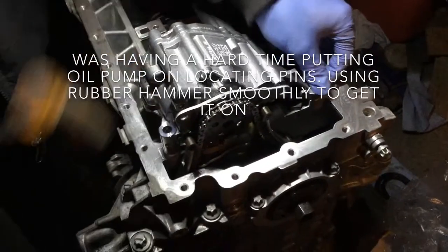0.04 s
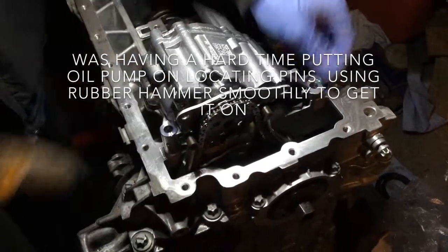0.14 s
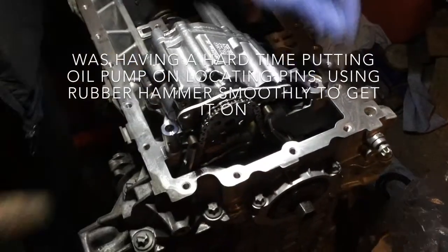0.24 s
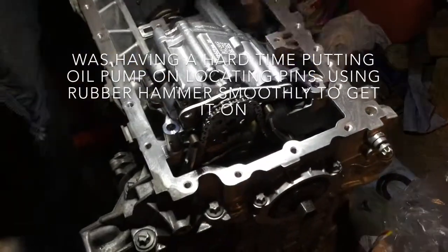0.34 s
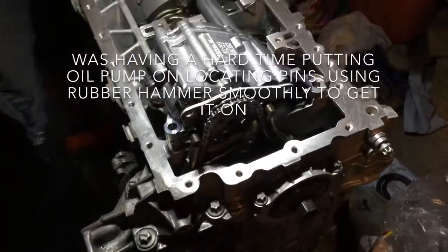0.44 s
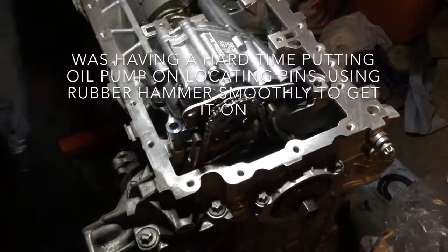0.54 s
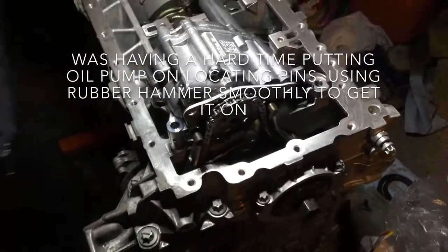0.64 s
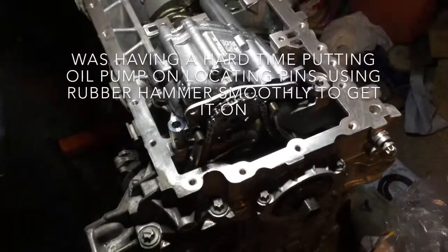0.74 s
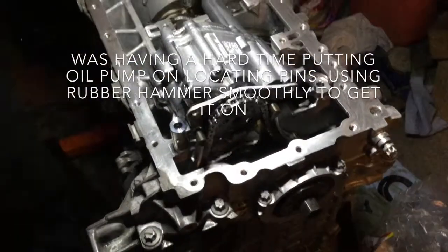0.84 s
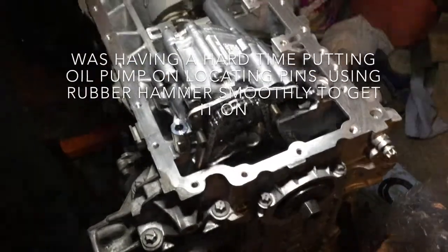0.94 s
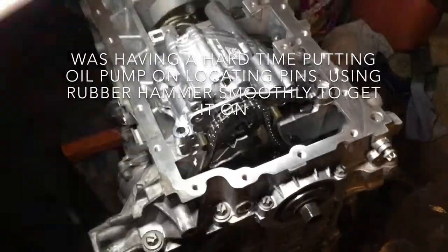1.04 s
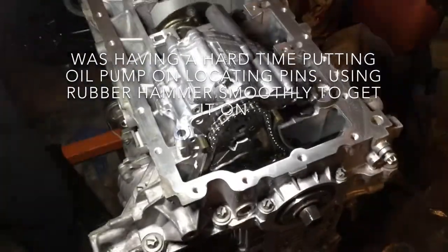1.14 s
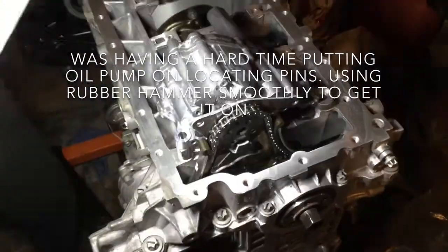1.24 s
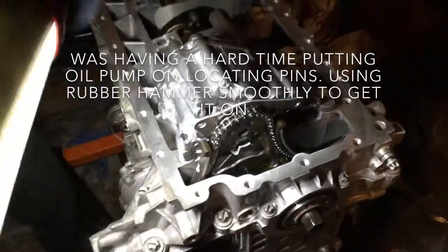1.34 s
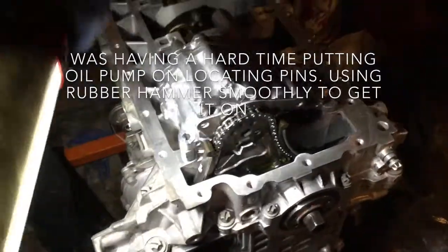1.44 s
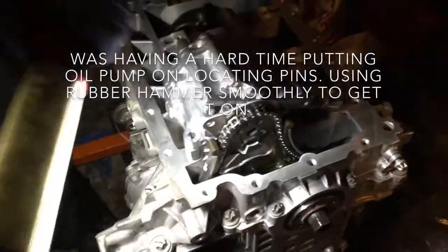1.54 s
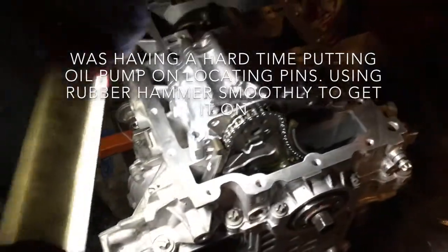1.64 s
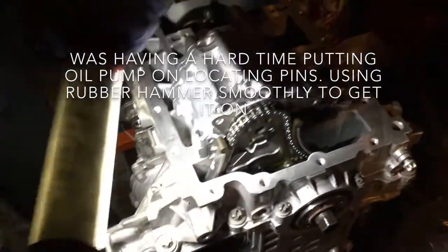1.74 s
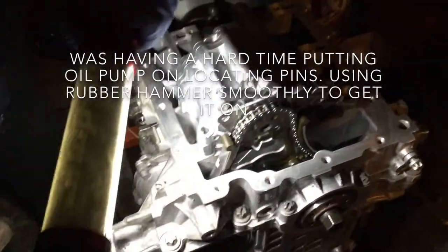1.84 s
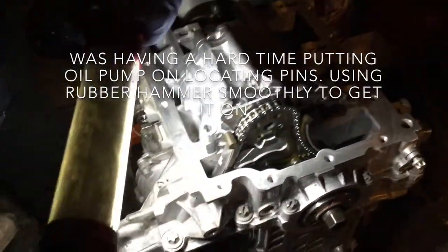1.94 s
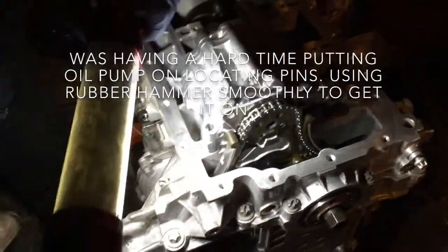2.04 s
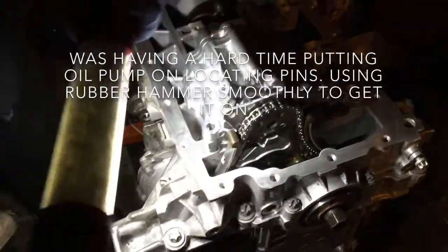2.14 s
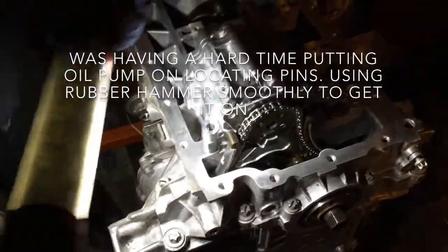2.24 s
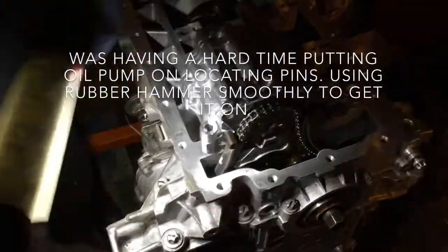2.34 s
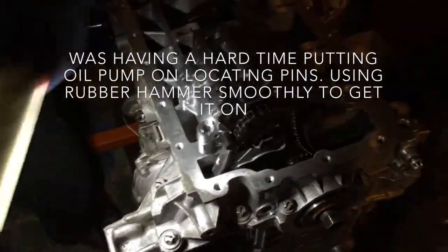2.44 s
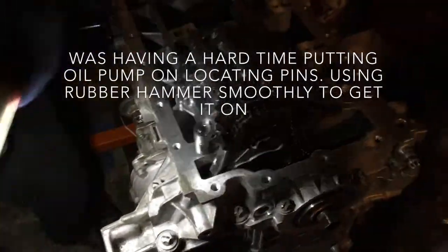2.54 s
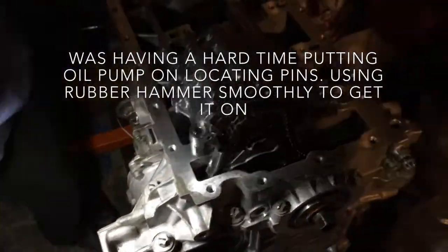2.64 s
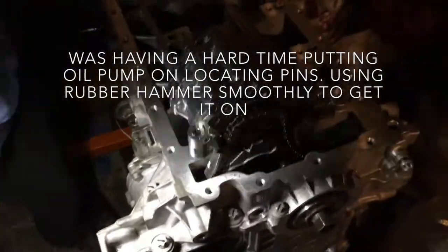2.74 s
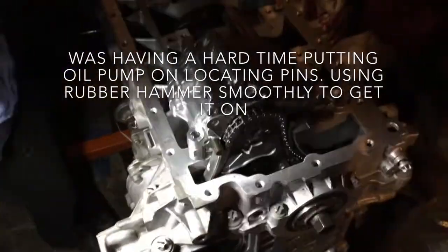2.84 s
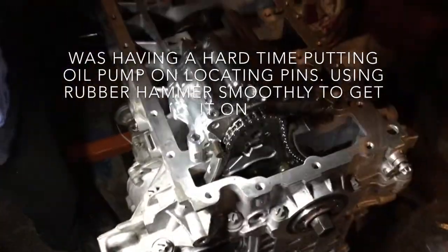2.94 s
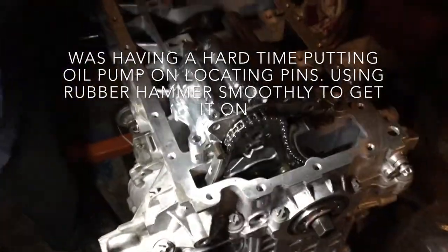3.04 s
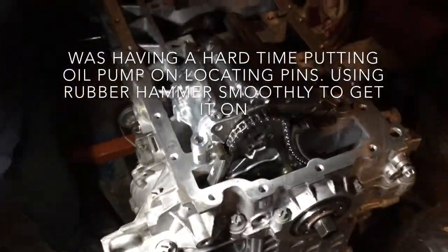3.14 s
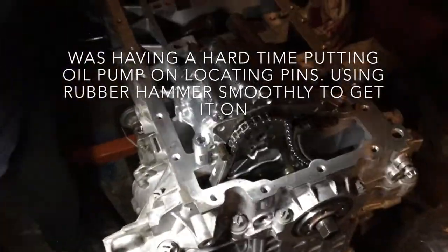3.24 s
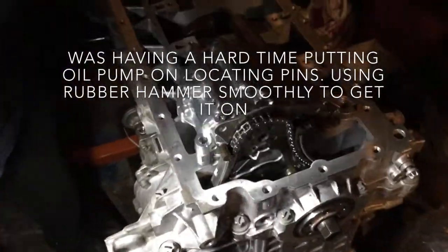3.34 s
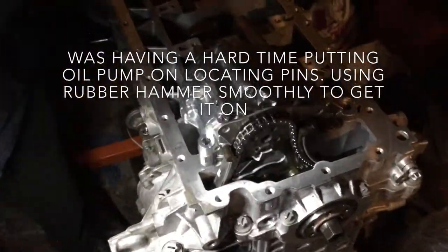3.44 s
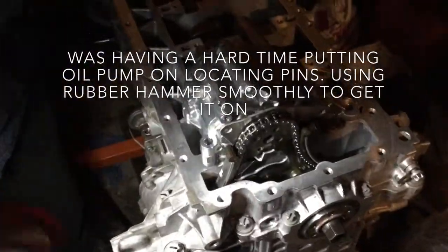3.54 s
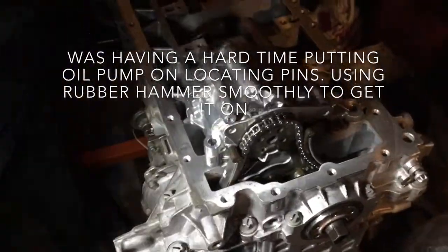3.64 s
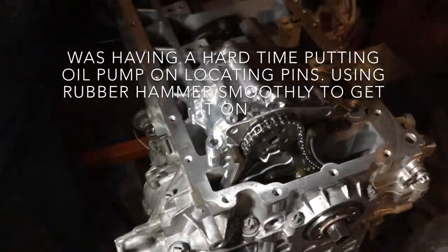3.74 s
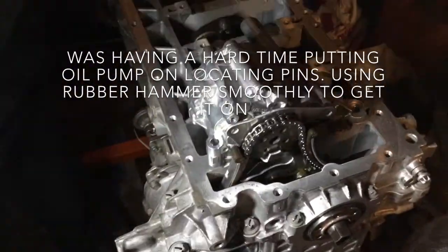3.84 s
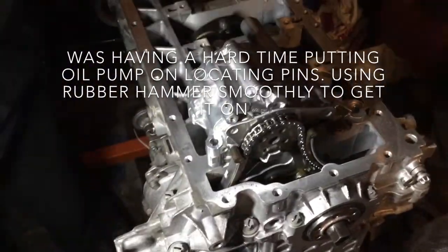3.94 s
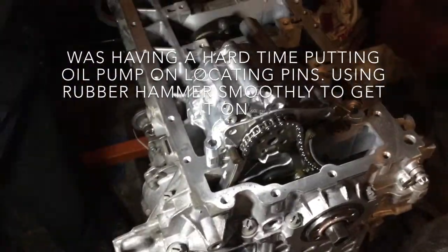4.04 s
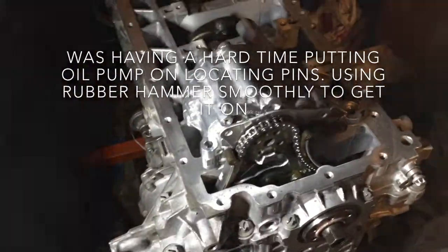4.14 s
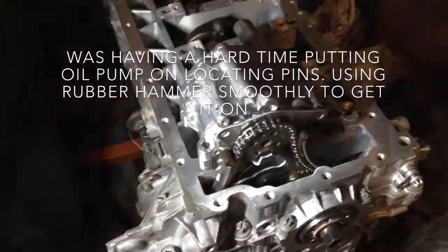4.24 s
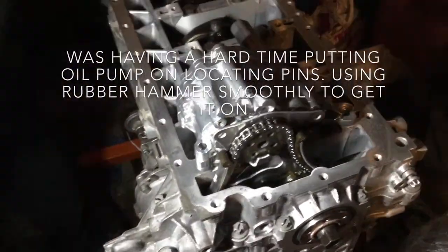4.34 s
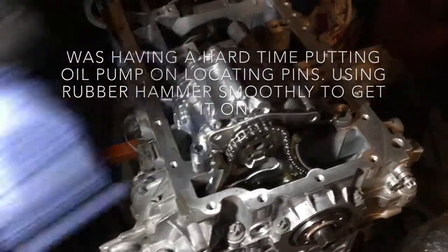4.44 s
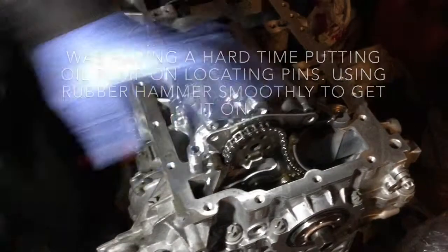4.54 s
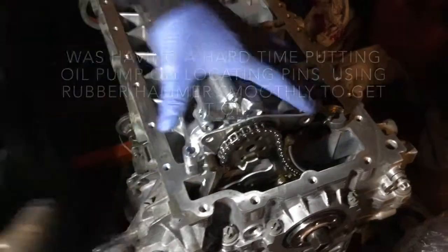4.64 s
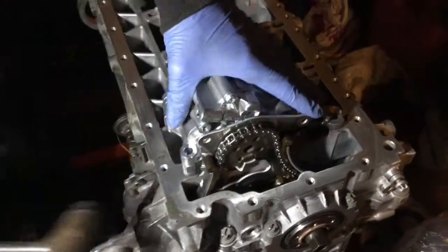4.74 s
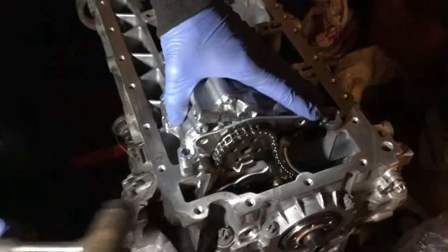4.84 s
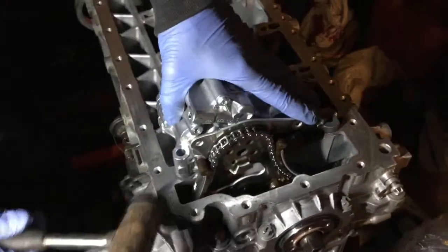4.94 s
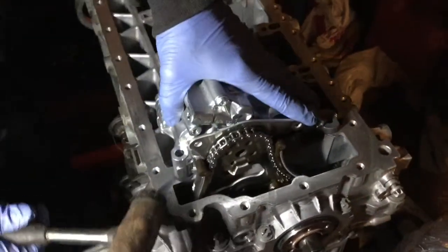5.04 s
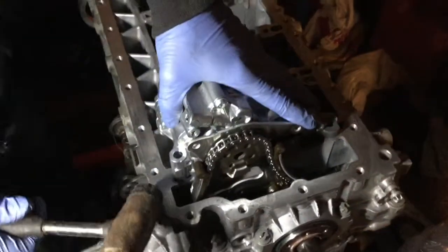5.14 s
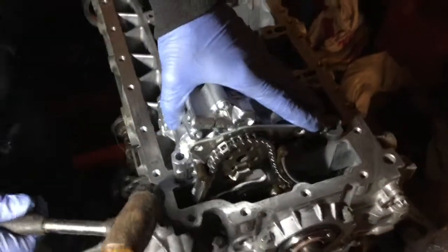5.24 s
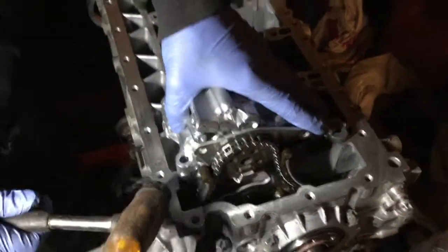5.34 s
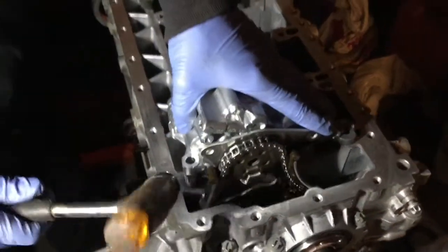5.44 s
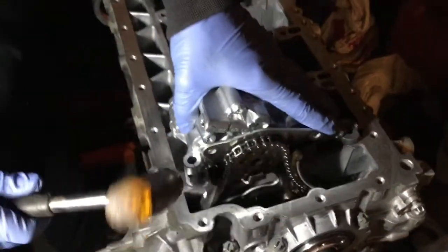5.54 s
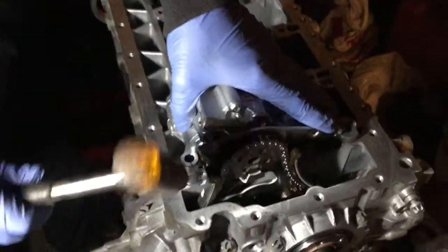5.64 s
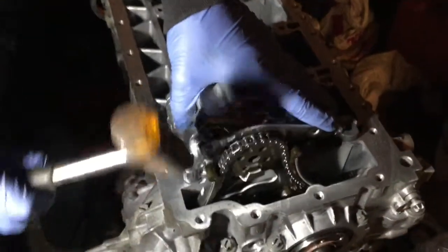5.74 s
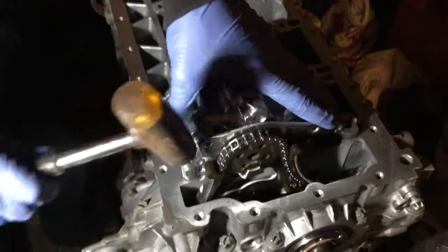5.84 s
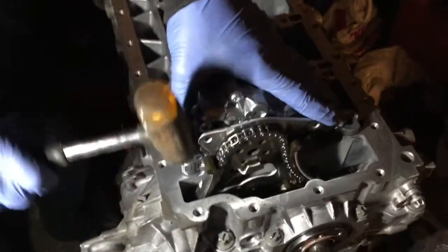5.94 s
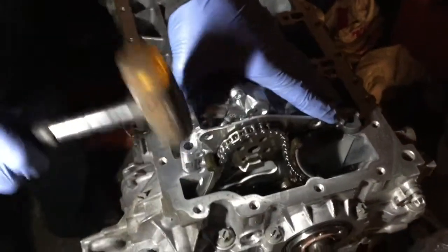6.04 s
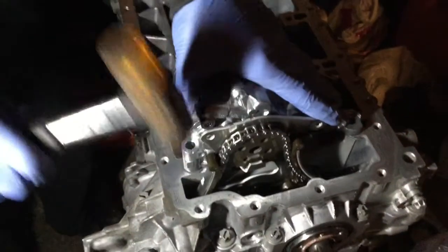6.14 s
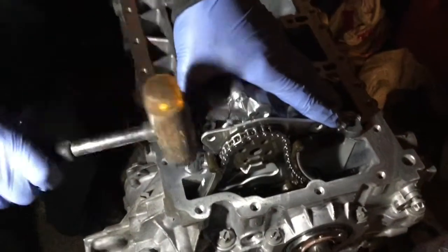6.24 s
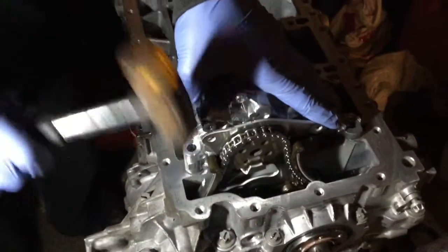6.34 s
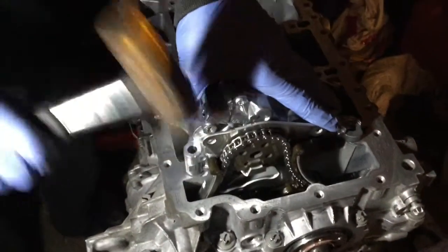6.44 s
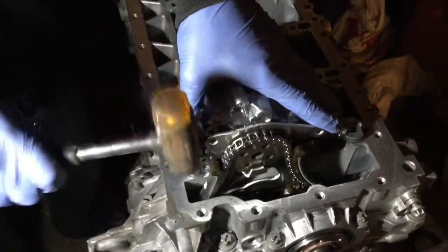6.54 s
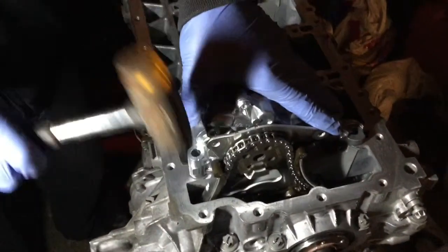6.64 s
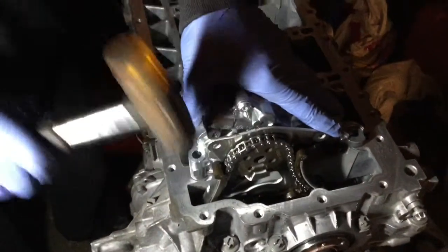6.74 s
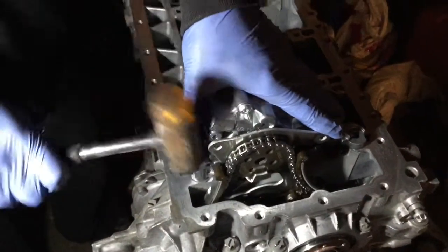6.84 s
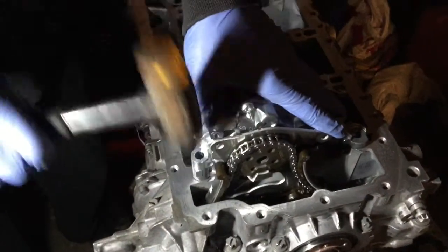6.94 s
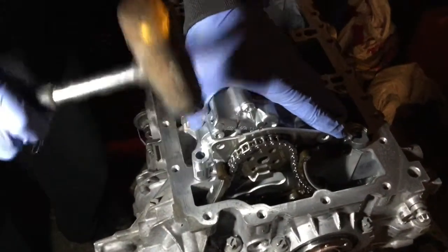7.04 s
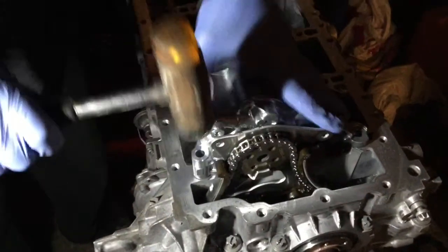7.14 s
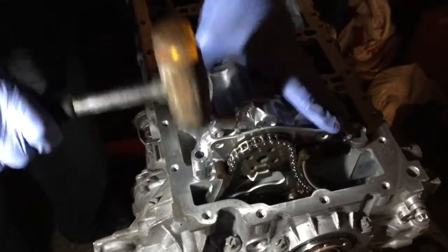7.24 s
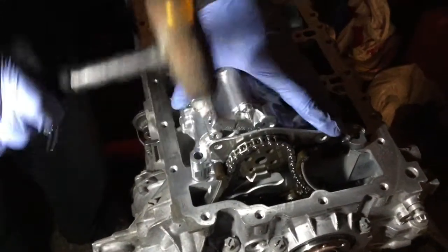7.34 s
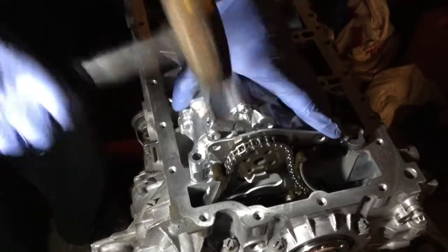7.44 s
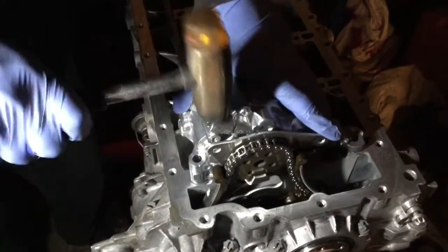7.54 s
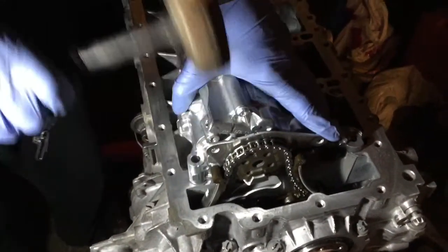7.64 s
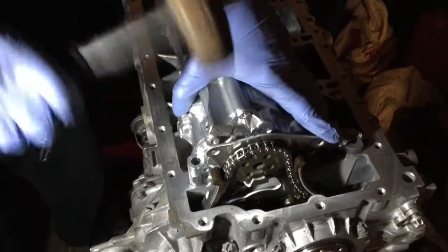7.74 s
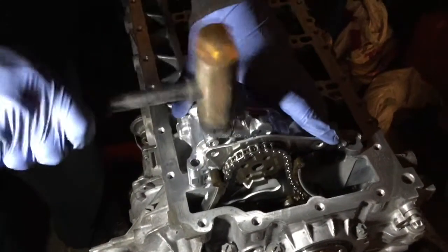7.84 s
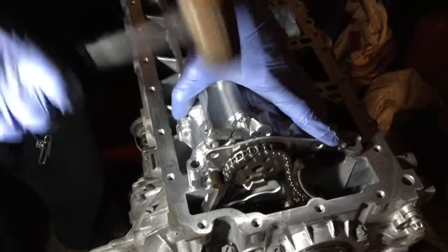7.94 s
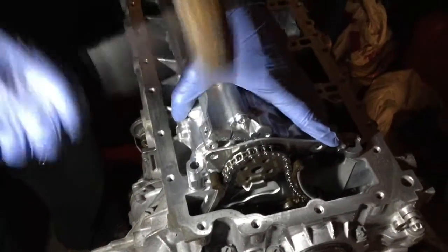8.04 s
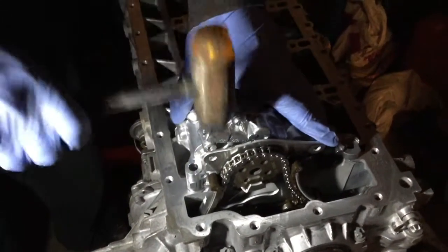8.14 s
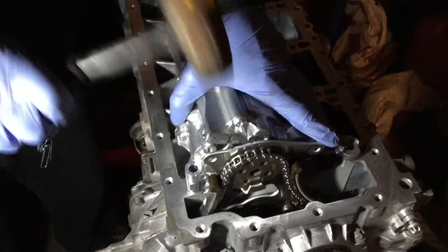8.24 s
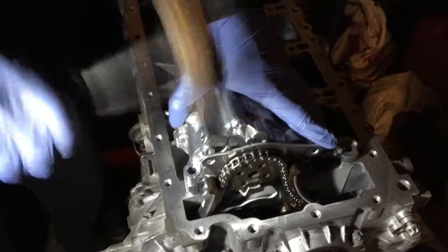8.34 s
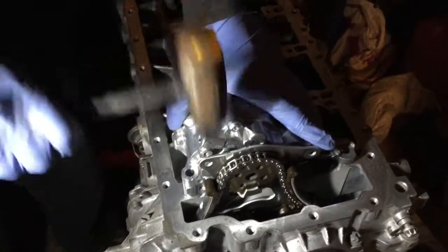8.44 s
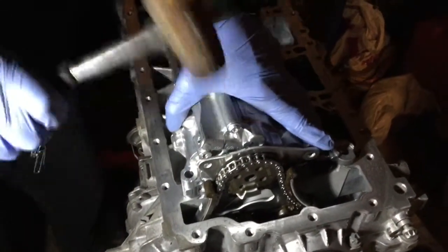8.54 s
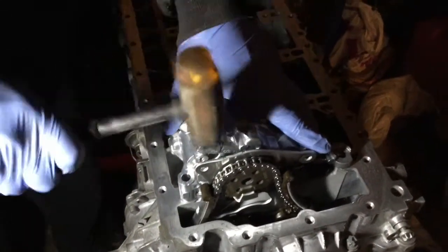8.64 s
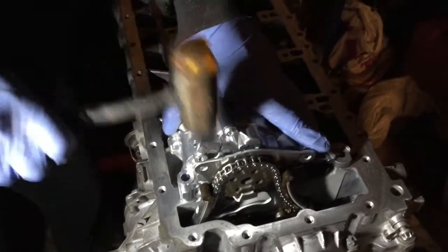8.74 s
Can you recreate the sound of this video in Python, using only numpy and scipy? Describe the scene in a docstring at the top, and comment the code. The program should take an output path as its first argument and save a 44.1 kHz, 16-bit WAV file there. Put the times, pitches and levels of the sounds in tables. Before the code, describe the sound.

A single close microphone picks up someone working on an engine: faint room rumble, cloth rustle, soft thumps, a crackling glove and a scatter of light metallic clinks with one brief squeak. In the second half, far louder mallet knocks land on the hollow casting, about three per second, dull in body, turning brighter and clankier, the hardest leaving a thin high ring.

```python
"""A quiet garage: low rumble, faint hiss and cloth swishes of filtered noise, soft hand thumps of short noise bursts.
Near 0.7 s a glove crackles in puffs of treble, then loose metal parts clink: damped modes over noisy rattle.
At 2 s a glove squeaks on the work lamp, a gliding tone with its octave.
From 5 s a rubber mallet drives a cast pump home, each blow ringing the modes and dense wash of the engine casting.
Near 8 s the hardest blows leave a thin steel part singing on one decaying sine."""
import sys
import numpy as np
from scipy import signal
from scipy.fft import rfft, irfft, next_fast_len
from scipy.io import wavfile
from scipy.ndimage import uniform_filter1d

SR = 44100
rng = np.random.default_rng(int(sys.argv[2]) if len(sys.argv) > 2 else 0)


def bounce(signal):
    """Save signal as a 16-bit WAV file at the path given by the first command-line argument."""
    frames = np.transpose(np.atleast_2d(signal))
    limited = np.clip(frames, -1, 1)
    pcm = np.round(limited * 32767).astype(np.int16)
    wavfile.write(sys.argv[1], SR, pcm)


def ratio_of_db(decibels):
    """Turn decibels (scalar or array-like) into linear amplitude factors; 0 dB maps to 1."""
    return 10 ** (np.asarray(decibels, float) / 20)


N = 387633
T = np.arange(N) / SR

# centres of the third-octave noise bands: hz
BAND_HZ = 40 * 2 ** np.arange(0, 8.7, 1 / 3)
# garage rumble, relative density: pitch_hz, level_db (per Hz)
RUMBLE = [(15, -47), (25, -9.5), (80, 0), (151, -4), (381, -9), (444, -22), (796, -11.5), (1050, -42.5),
          (1500, -13.5), (1950, -53), (3300, -120)]
# treble drive of the faint hiss, ahead of the cloth colour: time_s, level_db
HISS = [(0, -70), (1.6, -62), (1.82, -76), (2.15, -76), (2.35, -66.5), (5.0, -67.5), (5.15, -72),
        (5.8, -69.5), (7.45, -72), (7.9, -68.5), (8.79, -72)]
# sleeves and gloves, driven ahead of the cloth colour:
# fullest_s, rise_s, fall_s, treble_db, mid_db (2 kHz over treble)
SWISHES = [(.02, .07, 0.11, -59.5, -3.5), (.26, 0.25, 0.3, -55, -3), (.62, 0.084, 0.054, -61, -1.5),
           (.76, 0.099, 0.11, -53.5, -13), (1.03, 0.12, 0.088, -58, 6), (1.4, 0.5, .26, -60, -3),
           (2.33, 0.11, 0.2, -64, -6), (2.51, 0.16, .09, -63.5, -1.5), (2.68, 0.094, 0.062, -58, -8),
           (3.01, 0.19, 0.25, -49.5, -8.5), (3.42, 0.28, 0.26, -53.5, -3), (3.7, 0.52, 0.15, -48.5, -8.5),
           (3.86, 0.029, .05, -56.5, -7), (4.08, 0.8, 0.56, -62.5, -11), (4.4, 0.083, 0.34, -52, -6.5),
           (4.76, .2, 0.41, -48, -7), (5.34, 0.032, 0.096, -62.5, -3), (6.129, 0.2, 0.23, -66, -3),
           (6.73, 0.33, 0.39, -65, -2.5), (7.03, 0.061, 0.067, -63, -11), (7.16, 0.055, 0.22, -55, -10),
           (7.335, 0.07, 0.037, -53, -16.5)]
# where mid, dip and treble of the swishes are set: hz
SWISH_HZ = [2050, 6300, 14600]
# colour of the cloth: pitch_hz, level_db (per third octave)
CLOTH_COLOUR = [(200, -26), (600, -21.5), (1000, -14.5), (3500, -10.5), (9000, -12.5), (13000, -8.5),
                (15800, -15)]
# soft thumps of hands and mallet head: start_s, low_db, mid_db, high_db, length_factor
THUMPS = [(0.019, -59, -63, -64, 2.8), (0.049, -79, -57, -68, 0.37), (0.379, -43.5, -39.5, -50, 0.79),
          (0.717, -48.5, -71, -65, 1.2), (0.747, -52, -54.5, -63, 1.2), (0.848, -54, -75, -80, 0.62),
          (0.889, -47.5, -54, -73, 1.8), (0.921, -54, -62, -72, 2.1), (0.990, -41.5, -44.5, -47.5, 1.3),
          (1.173, -60, -67, -75, 3.2), (1.344, -53.5, -65, -77, 1.15), (1.489, -59, -60.5, -75, 0.64),
          (1.880, -60.5, -58.5, -80, 1.2), (2.499, -67, -63.5, -78, 1.6), (3.15, -57, -66, -80, 2),
          (4.418, -60.5, -66, -56.5, 0.58), (5.212, -67, -61, -71, 0.36), (5.313, -66, -59, -65, 3),
          (7.059, -53.5, -58, -85, 0.91), (7.193, -54, -59.5, -75, 0.43)]
# registers of the thumps, in the order of their levels: low_hz, high_hz
THUMP_REGISTERS = [(50, 400), (400, 1500), (1500, 15800)]
# noise of a thump, t60 ahead of the length factor: pitch_hz, level_db, t60_s
THUMP_WASH = [(60, -6, 0.28), (238, 9.5, 0.16), (730, 16.5, 0.12), (2550, 1, 0.022), (5900, -7.5, 0.06),
              (12600, 0, 0.15)]
# dry glove crackles, drive of the treble noise: start_s, level_db
CRACKLES = [(0.693, -42), (0.712, -45), (0.7337, -44), (0.757, -41.5), (0.797, -41), (0.8144, -57)]
# loose metal parts clinking:
# start_s, main_db (1-2.4 kHz), upper_db (2.4-5 kHz over main), top_db (above 5 kHz over main), length_factor
CLINKS = [(0.796, -70, 10, 13, .4), (0.8888, -41, -5.5, -19.5, 1.7), (0.92, -47.5, -4.5, -27, .78),
          (0.9885, -38.5, -9.5, -33, 0.95), (1.0013, -48.5, 5.5, -9, 0.88), (1.1399, -44, 0, -16.5, 1.1),
          (1.1724, -47.5, -4.5, -31, 1.5), (1.28, -52, 0, -13.5, 2.8), (1.3086, -45.5, -8.5, -20, 1.2),
          (1.3898, -40.5, -7.5, -32, 1.7), (1.4438, -51, -6, -28, 0.59), (1.4884, -57, -21, -25, 1.01),
          (1.5227, -37, 2.5, 0.9, 1.43), (1.6987, -66.5, -13, -3, 0.79), (1.7826, -68, -6, -5, 0.26),
          (1.878, -57.5, -10.5, -17, 2), (1.942, -42.5, 1, -13.5, 1.4), (2.2796, -46.5, 4.5, -5, 1.6),
          (2.3315, -38.5, -1.5, -15, 1.57), (2.4986, -61, -5, -19, 1.3), (2.9644, -53, -4.5, -12, 2),
          (3.1423, -40, 4.5, -10, 1.54), (3.296, -53, -1.5, -26, 2.6), (3.7545, -47, -9.5, -29, 1.4),
          (3.938, -40.5, -1, -21.5, 2.1), (3.9848, -56.5, 4, -28, 0.7), (4.5132, -47, -10, -24, 1.6),
          (4.7262, -45.5, -6.5, -9, 1.3), (4.7978, -51, -1.5, -11, 3), (5.4511, -44.5, -1, -16, 1.9),
          (5.5807, -52.5, -12, -30, 1.8), (5.6788, -69, 3.5, 1, 0.27), (6.221, -46.5, -4, -19, 2.5),
          (6.365, -50, -12.5, -30, 1.4), (6.538, -47, 0.5, -3, .4), (6.9545, -52, -12, -35, 2.4),
          (7.153, -49.5, -6, -31, 1.7), (7.1926, -52, -4, 2.5, 0.42), (7.755, -56, -11, -37, 3.6),
          (8.034, -61.5, -24.5, -22.5, .49), (8.3124, -71, -11, -16, .87),
          (8.5918, -68.5, -18.5, -15, 1.34)]
# registers of the parts, main first, then bass, upper, top: low_hz, high_hz
PART_REGISTERS = [(1000, 2400), (150, 1000), (2400, 5000), (5000, 15800)]
# resonant modes of the parts, ahead of scatter, drift and stretch: pitch_hz, level_db, t60_s
PART_MODES = [(250, -8, .2), (320, -8, .2), (1300, -4, .15), (1650, -7, .12), (1820, 0, .17),
              (2060, -1, .1), (2250, -7, .1), (2450, -7, .12), (2650, -6, .13), (2900, -9, .1),
              (3200, -5, .1), (3450, -6, .12), (3670, -3, .14), (3900, -9, .1), (4140, -6, .09),
              (4400, -10, .09), (4700, -9, .1), (4910, -13, .09), (5500, -12, .09), (6140, -16, .1),
              (7620, -14, .12)]
# unresolved rattle of the parts, t60 ahead of the length factor: pitch_hz, level_db, t60_s
PART_WASH = [(300, -3, .22), (900, -11, .14), (1400, -6, .15), (2200, -5, .15), (3500, -5, .14),
             (5000, -9, .13), (8000, -5, .11), (12500, -3, .11), (15500, -9, .1)]
# glove on the lamp, levels ahead of the flutter: time_s, pitch_hz, first_db, octave_db
SQUEAK = [(2.015, 838, -88, -93), (2.03, 855, -65, -91), (2.06, 855, -70, -73), (2.075, 784, -70, -65),
          (2.095, 878, -68, -56.5), (2.116, 860, -73, -70), (2.14, 860, -98, -84)]
# mallet blows: start_s, body_db (low register), hard_db (clank over body), crack_db (above 4.5 kHz over clank)
BLOWS = [(4.9642, -44.5, -7.5, -22), (5.003, -27.5, -16, 1), (5.375, -29, -12.5, -3.5),
         (5.9537, -29, -16, 1), (6.2585, -23, -8.5, -2.7), (6.5551, -20, -7, 0.2),
         (6.8425, -22.5, -6.5, -1.5), (7.5545, -21.5, -8, -7.5), (7.8484, -20, 0, -6.5),
         (8.1255, -19.5, 2.5, -7), (8.407, -18.5, -8.5, 0), (8.6762, -22, 8, -9)]
# registers of the casting: knock first, then body, shell, clank, crack: low_hz, high_hz
CASTING_REGISTERS = [(1050, 1800), (110, 450), (450, 1050), (1800, 4500), (4500, 15800)]
# resonant modes of the casting, ahead of scatter and drift: pitch_hz, level_db, t60_s
CASTING_MODES = [(200, -10, .19), (255, -5, .13), (315, 3, .23), (368, -12, .15), (615, -9, .13),
                 (702, -1, .14), (780, -8, .13), (926, -12, .13), (1150, -14, .12), (1292, -1, .18),
                 (1346, -1, .18), (1450, -14, .12), (1660, -7, .12), (1750, -11, .13), (1825, -18, .35),
                 (1880, -8, .12), (2150, -3, .12), (2285, -8, .12), (2440, -2.5, .13), (2680, -5, .11),
                 (2890, -10, .11), (3070, -12, .1), (3340, -10, .1), (3980, -16, .08), (5500, -14, .1),
                 (7330, -12, .07), (9200, -7, .16), (9600, -7, .14), (11600, -10, .08), (13100, -8, .1),
                 (14000, -8, .13)]
# dense unresolved ringing of the casting: pitch_hz, level_db, t60_s
CASTING_WASH = [(103, -15, 0.25), (257, -6, 0.22), (690, -21.5, 0.27), (1610, 2, 0.12), (2220, 3, 0.16),
                (3770, -7.5, 0.15), (5600, -11, 0.36), (6800, -3, 0.12), (8200, -4, 0.12), (9700, -3, 0.22),
                (12200, 7, 0.045), (15400, -11, 0.033)]
# thin steel part singing on after the hardest blows: start_s, level_db, t60_s
SINGING = [(7.853, -52, .5), (8.129, -55, .55)]


def along(hz, table, column=1):
    """Read a column of a table laid out over frequency, on a logarithmic pitch axis."""
    table = np.array(table)
    return np.interp(np.log(hz), np.log(table[:, 0]), table[:, column])


def third_octaves():
    """White noise cut into overlapping third-octave bands, each of rms 1."""
    size = next_fast_len(N)
    octave = np.log2(np.maximum(np.fft.rfftfreq(size, 1 / SR), 1))
    white = rfft(rng.standard_normal(size))
    bands = []
    for hz in BAND_HZ:
        share = np.maximum(1 - 3 * abs(octave - np.log2(hz)), 0)
        band = irfft(white * np.sqrt(share), size)[:N]
        bands.append(band / band.std())
    return np.array(bands)


def walk(rate):
    """Random levels held 1 / rate s and slewed twice; spread near 1."""
    hold = int(SR / rate)
    steps = np.repeat(rng.standard_normal(N // hold + 1), hold)
    return 1.3 * uniform_filter1d(uniform_filter1d(steps, hold), hold)[:N]


def strikes(events, registers, modes, wash, noise, rise_s, snap_s, snap_db, wash_db, cut_s, scatter_db, split,
            bounce_db, echo_db, echo_t60, patchy_db, chatter_db, ring_snap_db, drift):
    """Each hit rings damped modes and a wash of noise; every register takes its own level."""
    t = np.arange(int(.4 * SR)) / SR
    out = np.zeros(N + 2 * len(t))
    modes = np.array(modes).reshape(-1, 3)
    chance = rng.standard_normal((len(events), 2 * len(modes) + 3))
    patches = rng.standard_normal((len(events), len(BAND_HZ)))
    chatter = ratio_of_db(chatter_db * walk(250))
    # the clear ring is cut short
    cut = np.exp(-(t / cut_s) ** 6)
    snap = np.exp(-t / snap_s)
    for (start, *levels), luck, patch in zip(events, chance, patches):
        # a last column beyond the registers stretches the rattle
        longer = levels[-1] if len(levels) > len(registers) else 1
        i = int(start * SR)
        j = int(abs(luck[-1]) * SR) % (N - len(t))  # a random stretch of the noise
        share, detune = luck[:-3].reshape(2, -1, 1)
        for db, (lo, hi) in zip(levels, registers):
            # soft contact builds the sound up, the bass more slowly
            rise = (1 - np.exp(-t / (rise_s + 0.11 / lo))) ** 2
            inside = (BAND_HZ >= lo) & (BAND_HZ < hi)
            hz = BAND_HZ[inside]
            # a quick snap at contact, the slower wash, then the faint echo of the garage
            fade = ratio_of_db(-60 * t / (longer * along(hz, wash, column=2)[:, None]))
            fade = fade + ratio_of_db(snap_db) * snap + ratio_of_db(echo_db - 60 * t / echo_t60)
            colour = ratio_of_db(along(hz, wash) + patchy_db * patch[inside])
            rattle = ratio_of_db(wash_db) * colour @ (fade * noise[inside, j:j + len(t)])

            picked = (modes[:, 0] >= lo) & (modes[:, 0] < hi)
            f, mode_db, t60 = modes[picked].T[:, :, None]
            # parts lie and are held differently each time, which shifts their modes a little
            f = f * (1 + drift * detune[::-1][picked])
            # every hit lands on another spot and shares its energy differently
            size = ratio_of_db(mode_db + scatter_db * share[picked] - 60 * t / (np.sqrt(longer) * t60))
            # each mode has a close neighbour that makes it beat
            neighbour = f * (1 + split * detune[picked])
            pair = np.sin(2 * np.pi * f * t) + .6 * np.sin(2 * np.pi * neighbour * t)
            ring = np.sum(size * pair * np.sign(detune[picked]), axis=0)
            # the ring loses its first energy while the contact lasts
            ring = cut * (1 + ratio_of_db(ring_snap_db) * snap) * ring

            # the contact chatters, so the sound comes in uneven knocks
            knocks = chatter[j:j + len(t)] if lo > 400 else 1
            sound = rise * knocks * (rattle + ring)
            # level counts over the first 10 ms
            sound = ratio_of_db(db) * sound / sound[:SR // 100].std()
            out[i:i + len(t)] += sound
            # loose things rattle back once, a moment later
            late = i + int((0.016 + .012 * abs(luck[-2])) * SR)
            out[late:late + len(t)] += ratio_of_db(bounce_db + 2 * luck[-3]) * sound
    floor_hz = registers[1][0] if len(modes) else registers[0][0]
    return signal.sosfilt(signal.butter(2, floor_hz, "high", fs=SR, output="sos"), out[:N])


def room(noise):
    """Low rumble of the garage: coloured noise below 1.5 kHz whose level wavers slightly."""
    # level per Hz becomes level per band through the root of the bandwidth
    gains = ratio_of_db(along(BAND_HZ, RUMBLE)) * np.sqrt(BAND_HZ) * (BAND_HZ < 1500)
    rumble = gains @ noise[:, ::-1]
    return ratio_of_db(-68 + 0.5 * walk(9)) * rumble / rumble.std()


def swish_colour(mid_db, dip_db):
    """Band gains of rubbing noise from its 2 kHz and 6 kHz levels against the treble."""
    return ratio_of_db(along(BAND_HZ, list(zip(SWISH_HZ, [mid_db, dip_db, 0]))))[:, None]


def swish(noise):
    """Cloth noise swells with each movement over a faint hiss; it flutters, and each band flickers a little."""
    power = (swish_colour(0.5, -7.5) * ratio_of_db(np.interp(T, *np.transpose(HISS)))) ** 2
    for s, rise, fall, db, mid_db in SWISHES:
        on = (T > s - rise) & (T < s + fall)
        ramp = np.interp(T[on], [s - rise, s, s + fall], [0, 1, 0])
        swell = np.sin(np.pi / 2 * ramp) ** 1.51
        # the 6 kHz dip fills up in thin swishes
        dip_db = -12 - 0.39 * mid_db
        power[:, on] += (ratio_of_db(db) * swish_colour(mid_db, dip_db) * swell) ** 2
    flutter = ratio_of_db(0.63 * walk(25))
    cloth = np.zeros(N)
    for hz, p, band in zip(BAND_HZ, power, noise):
        if hz > 180:
            flicker = ratio_of_db(along(hz, CLOTH_COLOUR) + 1.3 * walk(6.5))
            cloth += flicker * np.sqrt(p) * band
    return flutter * cloth


def hand_thumps(noise):
    """Soft contacts of hands and mallet head: slow-rising noise bursts without clear modes."""
    return strikes(THUMPS, THUMP_REGISTERS, [], THUMP_WASH, noise, rise_s=0.0035, snap_s=0.0027,
                   snap_db=14.0, wash_db=0, cut_s=0.33, scatter_db=0, split=0, bounce_db=-21,
                   patchy_db=1.0, chatter_db=3.5, ring_snap_db=0, drift=0, echo_db=-27, echo_t60=0.6)


def crackles(noise):
    """Dry glove crackles: short puffs of treble noise that die away exponentially."""
    treble = noise[(BAND_HZ > 8000) & (BAND_HZ < 15000)].mean(axis=0)
    decay_s = 0.0035
    puffs = sum(ratio_of_db(db) * (T > s) * np.exp(-np.maximum(T - s, 0) / decay_s) for s, db in CRACKLES)
    return puffs * treble[::-1]


def clinking_parts(noise):
    """Loose metal parts knock together: scattered, drifting modes over a rattling wash."""
    bass_db = -15.5  # 150-1000 Hz against the main register
    hits = [(s, db, db + bass_db, db + upper_db, db + top_db, longer)
            for s, db, upper_db, top_db, longer in CLINKS]
    return strikes(hits, PART_REGISTERS, PART_MODES, PART_WASH, noise, rise_s=0.00044, snap_s=0.0019,
                   snap_db=-8.5, wash_db=-9, cut_s=.13, scatter_db=3.5, split=0.021, bounce_db=-16.5,
                   patchy_db=3.5, chatter_db=2.5, ring_snap_db=-3.5, drift=.015, echo_db=-21, echo_t60=0.24)


def squeak():
    """A glove sticks and slips on the lamp: a gliding tone with its octave, unsteady in level."""
    s, hz, first_db, octave_db = np.transpose(SQUEAK)
    phase = 2 * np.pi * np.cumsum(np.interp(T, s, hz)) / SR
    first = ratio_of_db(np.interp(T, s, first_db)) * np.sin(phase)
    octave = ratio_of_db(np.interp(T, s, octave_db)) * np.sin(2 * phase)
    flutter = ratio_of_db(6.0 * walk(60))
    return np.sqrt(2) * (first + octave) * flutter * (T > s[0]) * (T < s[-1])


def mallet_blows(noise):
    """Rubber mallet on the casting: harder contact lifts the middle and upper registers over the body."""
    hits = []
    for s, body_db, hard_db, crack_db in BLOWS:
        knock_db = body_db - .6 + 0.44 * hard_db
        shell_db = body_db + 0.85 + 0.19 * hard_db
        clank_db = body_db + hard_db
        hits.append((s, knock_db, body_db, shell_db, clank_db, clank_db + crack_db))
    return strikes(hits, CASTING_REGISTERS, CASTING_MODES, CASTING_WASH, noise, rise_s=0.00088, snap_s=0.0043,
                   snap_db=14.0, wash_db=-7, cut_s=.135, scatter_db=3.0, split=0.036, bounce_db=-24.5,
                   patchy_db=2.5, chatter_db=2.16, ring_snap_db=0, drift=0.0037, echo_db=-18, echo_t60=0.21)


def singing():
    """One lightly damped mode of thin steel, struck again by each of the hardest blows."""
    fade = sum(ratio_of_db(db - 60 * np.maximum(T - s, 0) / t60) * (T > s) for s, db, t60 in SINGING)
    pitch_hz = 2783
    return np.sqrt(2) * fade * np.sin(2 * np.pi * pitch_hz * T)


def scene():
    """Hits, cloth, tones and room summed at one microphone."""
    noise = third_octaves()
    hits = mallet_blows(noise) + clinking_parts(noise) + hand_thumps(noise)
    steady = swish(noise) + crackles(noise) + squeak() + singing() + room(noise)
    # only the hits reach past the 15.9 kHz top edge of the other sounds
    steady = signal.sosfilt(signal.ellip(8, .2, 50, 15900, fs=SR, output="sos"), steady)
    return (hits + steady)[None]


def roll_off(x):
    """The treble ends steeply here."""
    return signal.sosfilt(signal.butter(12, 16820, fs=SR, output="sos"), x)


def record(dry):
    """The recorder clips the mix at full scale."""
    mix = np.clip(dry, -1, 1)
    return roll_off(mix)


dry = scene()
out = record(dry)
bounce(out)
```